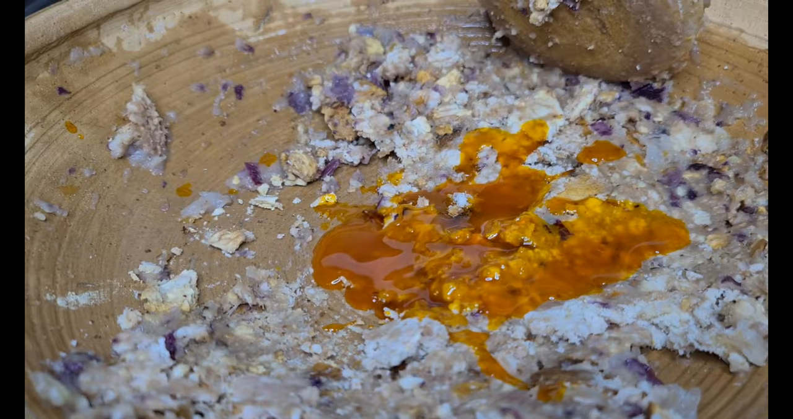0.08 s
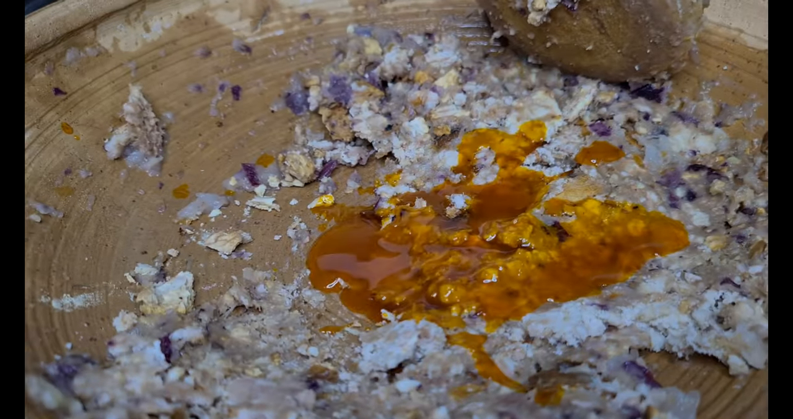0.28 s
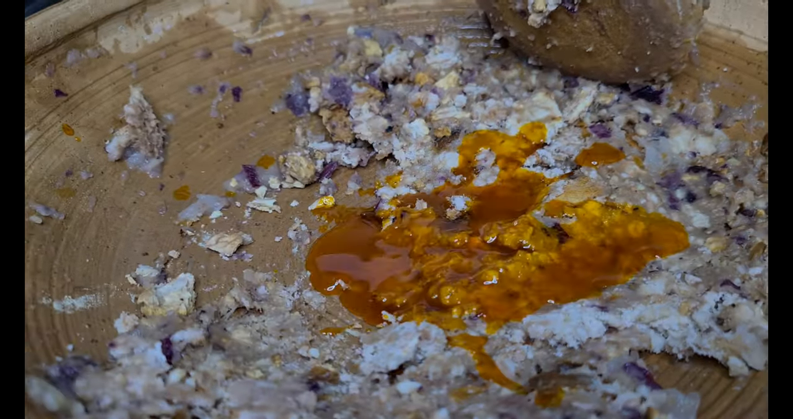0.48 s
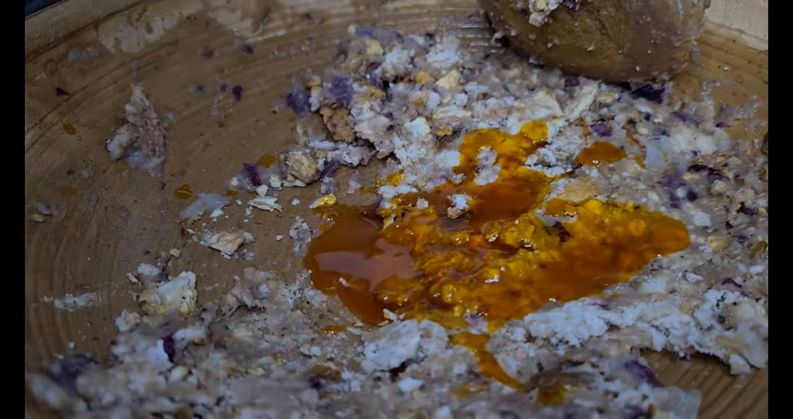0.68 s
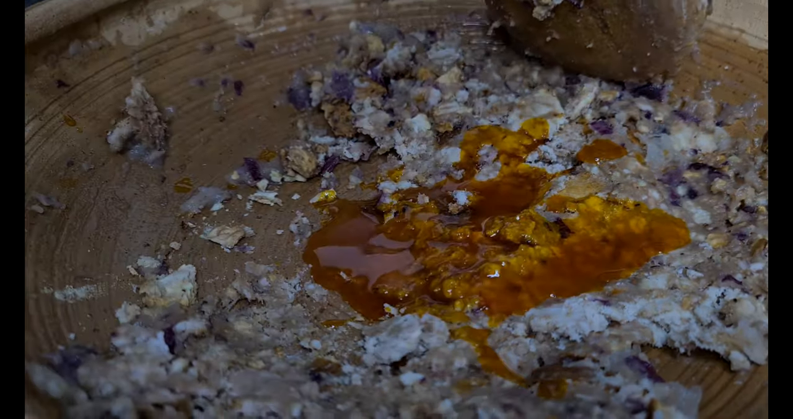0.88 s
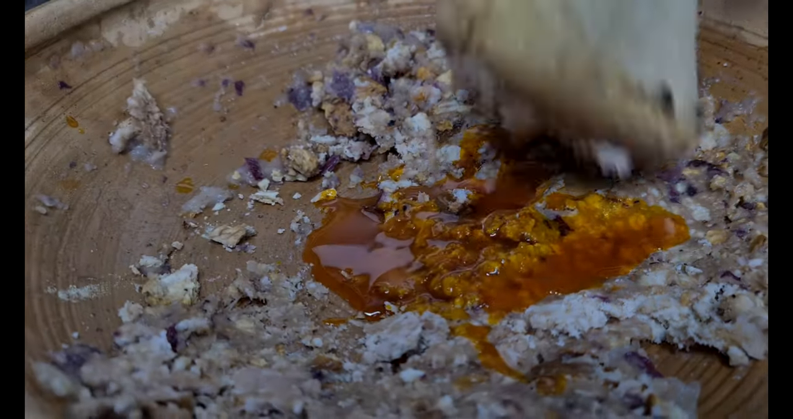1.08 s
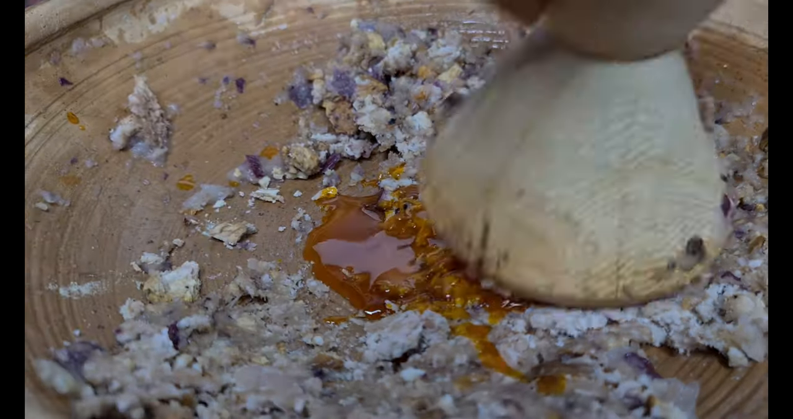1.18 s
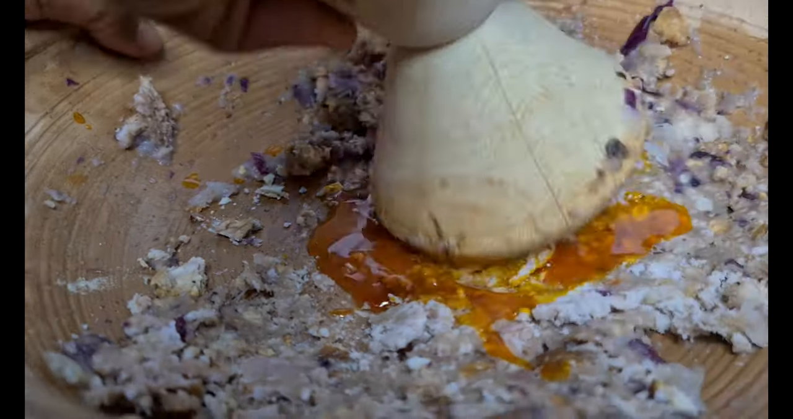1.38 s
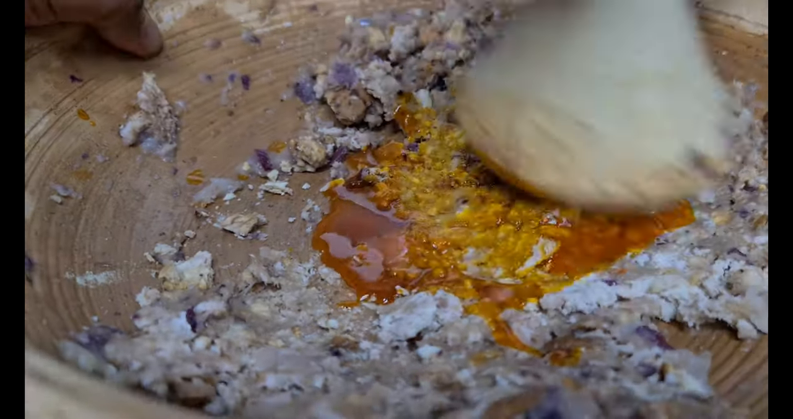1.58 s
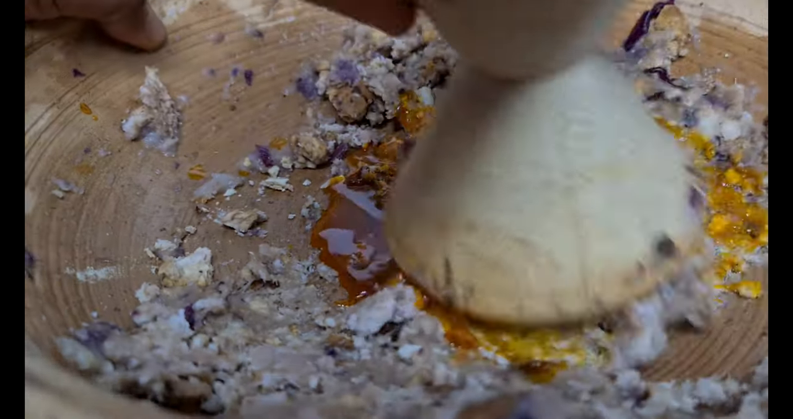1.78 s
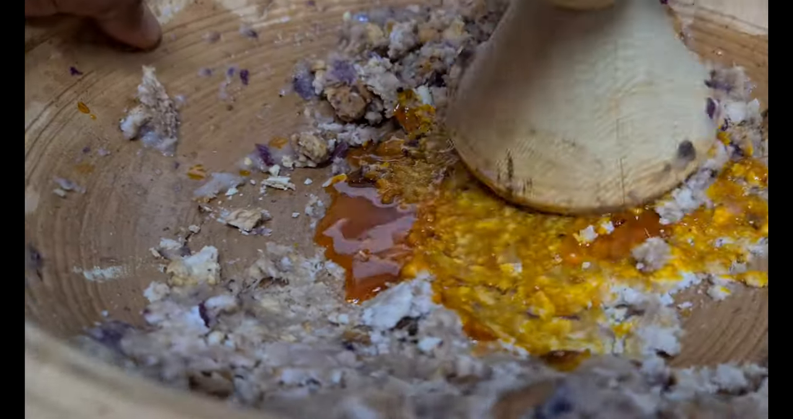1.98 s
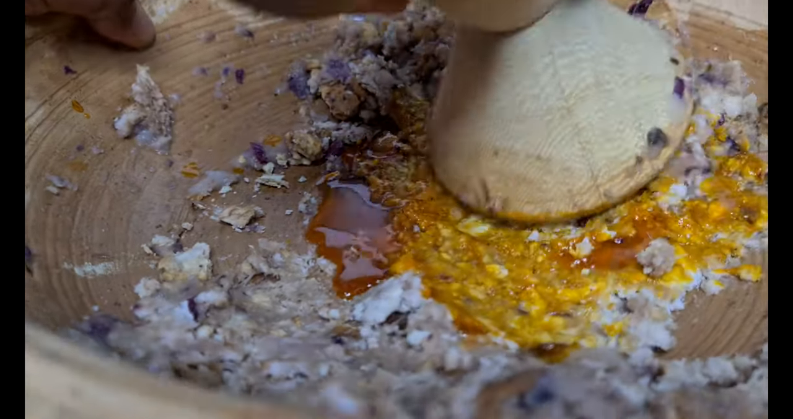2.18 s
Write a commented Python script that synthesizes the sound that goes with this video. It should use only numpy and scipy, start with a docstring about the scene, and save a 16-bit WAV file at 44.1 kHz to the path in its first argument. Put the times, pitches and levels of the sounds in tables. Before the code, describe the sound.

Wet mashing and scraping of a pestle in a clay bowl, preceded by dull knocks and a dish clink

```python
"""A low hum in a small kitchen, then two dull knocks with a light dish tap between them; a utensil slides
on the dish and clinks hard. Then a wooden pestle mashes oily onion and garlic in a ridged clay bowl:
rasp, crunch, squelch and pops. Clicks and clumped grains ring damped modes (bowl, dish, table) or pass
coloured filters (knocks, bits, paste). Low thuds come through the table.
Filtered noise and steady sines make the air and the hum."""
import sys
import numpy as np
from scipy import signal
from scipy.fft import rfft, irfft
from scipy.io import wavfile
from scipy.ndimage import uniform_filter1d

SR = 44100
rng = np.random.default_rng(int(sys.argv[2]) if len(sys.argv) > 2 else 0)


def wav_record(signal):
    """Record a signal, one row per channel, as 16-bit PCM in the file named by sys.argv[1]."""
    frames = np.transpose(np.atleast_2d(signal))
    bounded = np.clip(frames, -1, 1)
    # unit amplitude maps onto the largest positive 16-bit level
    quanta = np.round(bounded * 32767).astype(np.int16)
    wavfile.write(sys.argv[1], SR, quanta)


N = 97020
TIME_S = np.arange(N) / SR

# pestle strokes; rise and fall each span 20 dB:
# (peak time [s], rise [s], fall [s], bowl rasp [dB], crunch [dB], squelch [dB])
STROKES = [(0.874, 0.045, 0.19, -71, -70.5, -60), (1.02, .15, 0.09, -76, -78.5, -69.5),
           (1.165, 0.21, 0.28, -73.5, -65, -51), (1.33, .05, 0.22, -59.5, -58, -55),
           (1.419, 0.041, 0.021, -48, -49.5, -68.5), (1.463, 0.073, 0.039, -49, -50, -51.5),
           (1.521, 0.081, 0.064, -64, -64, -52), (1.603, 0.037, .15, -46.5, -51.5, -42),
           (1.667, 0.056, 0.043, -40.5, -46, -60), (1.773, 0.019, 0.078, -76, -67, -54),
           (1.811, 0.043, 0.054, -50.5, -49.5, -56), (1.832, 0.023, 0.077, -41, -42, -44.5),
           (1.868, 0.09, 0.14, -48.5, -69, -47), (2.024, 0.033, 0.25, -55, -68, -59.5),
           (2.183, 0.047, 0.1, -51.5, -44, -45)]
# modes of the clay bowl, damped by the paste: (frequency [Hz], level [dB], T60 [s])
BOWL_MODES = [(811, -7, 0.039), (1180, -10, 0.0261), (1380, -6.5, 0.018), (1498, -1, 0.032),
              (1610, -4.5, 0.019), (2070, -10, 0.0085)]
# spectrum of crunching bits: (frequency [Hz], level [dB])
CRUNCH_COLOUR = [(60, -23), (250, 2), (400, -2.5), (700, -1), (1000, -4), (1800, 0.5), (3200, 0),
                 (4500, -12.5), (7000, -14.5), (16000, -35)]
# spectrum of wet paste: (frequency [Hz], level [dB])
SQUELCH_COLOUR = [(500, -17.5), (2000, -2), (4500, 0), (7000, -1), (10000, -3), (14000, -3.5), (16000, -2)]
# single pops in the paste: (time [s], level [dB], pitch [Hz])
POPS = [(0.870, -39, 6200), (0.9342, -38.5, 7560), (1.2004, -30.5, 7700), (1.3632, -35, 3800),
        (1.3834, -33.5, 3380), (1.421, -33, 1460), (1.445, -33, 11600), (1.5785, -43, 10000),
        (1.600, -24.5, 7600), (1.628, -36, 6950), (1.661, -33, 910), (1.667, -23, 1200), (1.768, -34, 9000),
        (1.8308, -26.5, 3000), (1.8318, -25, 10500), (1.8705, -24.5, 5940), (1.9295, -21.5, 9000),
        (2.157, -33.5, 3100)]
# pushes that thud through the table: (time [s], level [dB])
THUDS = [(0.234, -30), (0.262, -32), (0.326, -30.5), (0.354, -32.5), (0.585, -35.5), (0.612, -34.5),
         (0.66, -39), (0.852, -35), (1.599, -24), (1.626, -26.5), (1.653, -25.5), (1.807, -31.5),
         (1.850, -24.5), (1.981, -27.5), (1.993, -25), (2.018, -31), (2.033, -35), (2.176, -35.5)]
# modes of the table: (frequency [Hz], level [dB], T60 [s])
TABLE_MODES = [(73.6, -2, 0.22), (110.3, -1.5, 0.15), (148, -13, 0.17)]
# utensil strikes on the dish: (time [s], ring [dB], crack [dB], softness corner [Hz])
CLINKS = [(0.3123, -29, -4, 14000), (0.5797, -16, -11.5, 3960), (0.5811, -5, 6, 5110)]
# modes of the ceramic dish: (frequency [Hz], level [dB], T60 [s])
DISH_MODES = [(784.6, -21.5, 0.16), (1323, -23, 0.033), (1772, -8, 0.057), (2509, -9.5, 0.15),
              (2660, -16, 0.12), (2977, -8.5, 0.073), (3000, -5, 0.097), (3070, -20.5, 0.15),
              (4452, -16.5, 0.031), (4576, -15, 0.091), (4593, -12.5, .06), (6400, -22.5, 0.086),
              (8450, -15.5, 0.095), (10790, -16.5, .09)]
# spectrum of the contact with the dish: (frequency [Hz], level [dB])
CRACK_COLOUR = [(60, -54.5), (250, -24.5), (420, -25.5), (600, 0), (1000, -15), (1300, -17), (2000, -6.5),
                (2550, 6.5), (3200, -1), (3700, -14.5), (4700, 4), (5700, -14), (7000, -6), (8500, -5),
                (9400, -16), (11000, -10), (13500, -9.5), (16000, -22.5)]
# level curve of the utensil sliding on the dish: (time [s], level [dB])
SLIDE = [(0.31, -82), (0.325, -43.5), (0.36, -60), (0.44, -47.5), (0.452, -46.5), (0.48, -40.5),
         (0.508, -31), (0.54, -37.5), (0.578, -44), (0.59, -76)]
# dull knocks on the worktop: (time [s], level [dB])
KNOCKS = [(0.2302, 7), (0.3512, 7)]
# spectrum of the knocks: (frequency [Hz], level [dB])
KNOCK_COLOUR = [(40, -19.5), (110, -4.5), (340, -4), (550, -6), (950, -7.5), (1300, -0.5), (1900, -4),
                (2900, -5.5), (4000, -16), (5200, -32.5), (7000, -36.5), (10000, -46.5), (16000, -72)]
# spectrum of the air noise: (frequency [Hz], level [dB])
AIR_COLOUR = [(20, -15.5), (40, -12), (60, 0), (130, 0), (200, -9.5), (400, -13.5), (700, -15.5),
              (1400, -24.5), (2500, -31.5), (5000, -43.5), (9000, -53), (16000, -60.5)]
# steady hum partials: (frequency [Hz], level [dB rms])
HUM = [(58.5, -54), (117, -62), (146, -60), (240, -64.5), (364, -69.5)]
# reverberation time of the kitchen: (frequency [Hz], T60 [s])
ROOM_T60 = [(100, 0.55), (300, 0.63), (700, 0.32), (3000, 0.4), (6000, 0.42), (14000, 0.25)]

RASPS_PER_S, CRUNCHES_PER_S, SQUELCHES_PER_S = 3600, 1800, 4500
GRAIN_CYCLES, POP_CYCLES = 9.6, 8.4  # cycles within one T60
CLUMP_DB, CLUMP_S = 2.5, 0.012
THUD_SOFT_HZ = 151.3
SLIPS_PER_S, SLIP_SOFT_HZ, SLIP_CRACK_DB = 1000, 3420, 33.5
CRACK_T60_S, CRACK_RATTLE_DB = 0.039, 10
DISH_LOW_HZ = 372  # the dish sounds without bass
KNOCK_T60_S, KNOCK_RATTLE_DB = 0.031, 5
RATTLE_SPREAD_DB = 2.5  # each channel's own noise against the shared noise
AIR_DB, AIR_SIDE_DB, AIR_SIDE_HZ = -53.5, 0.5, 273
ROOM_DELAY_S, ROOM_BUILD_S = 0.002, 0.0013
# pan: left over right; lag: right behind left; room: reverberation against direct sound
BOWL_PAN_DB, BOWL_LAG_S, BOWL_ROOM_DB = 5, 0.00003, -3.5
PASTE_PAN_DB, PASTE_ROOM_DB = 1.5, -11
DISH_PAN_DB, DISH_LAG_S, DISH_ROOM_DB, KNOCK_ROOM_DB = 1.5, 0.00043, -4.5, 0
MIC_LOW_HZ, CUTOFF_HZ = 44, 16000


def stroke_gains():
    """Each stroke swells and dies; strokes add in power, giving rasp, crunch and squelch gains."""
    power = 0
    for peak_s, rise_s, fall_s, *levels_db in STROKES:
        shape = 10 ** -np.maximum((peak_s - TIME_S) / rise_s, (TIME_S - peak_s) / fall_s)
        power = power + np.outer(from_db(levels_db), shape) ** 2
    return np.sqrt(power)


def grinding(rasp_gain, crunch_gain):
    """The pestle catches on the ridges, ringing the bowl, and crushes bits against them."""
    rasp = rms_one(ring(grains(RASPS_PER_S, spread_db=4.5), BOWL_MODES))
    bits = crackle(CRUNCHES_PER_S, spread_db=3.5, low_hz=348, high_hz=9000)
    crunch = rms_one(coloured(bits, CRUNCH_COLOUR))
    return rasp_gain * rasp + crunch_gain * crunch


def paste(squelch_gain):
    """Tiny wet films burst on both sides of the pestle, with a few larger pops."""
    films = [crackle(SQUELCHES_PER_S, spread_db=2.0, low_hz=2030, high_hz=15500) for _ in range(2)]
    fizz = rms_one(coloured(np.array(films), SQUELCH_COLOUR))
    pops = sum(ring(clicks([(s, db)]), [(hz, 0, POP_CYCLES / hz)]) for s, db, hz in POPS)
    return fizz * squelch_gain + pops


def table():
    """Soft downward pushes make the table boom."""
    pushes = soft(soft(clicks(THUDS), THUD_SOFT_HZ), THUD_SOFT_HZ)
    return -ring(pushes, TABLE_MODES)


def dish():
    """Strikes and the stick-slip of the slide ring the same dish; their contact adds cracks."""
    strikes = sum(soft(clicks([(s, db)]), hz) for s, db, _, hz in CLINKS)
    crack_clicks = clicks([(s, db) for s, _, db, _ in CLINKS])
    cracks = convolve(crack_clicks, burst(CRACK_T60_S, CRACK_RATTLE_DB))

    slips = soft(grains(SLIPS_PER_S, spread_db=3.5), SLIP_SOFT_HZ)
    slide_db = np.interp(TIME_S, *np.transpose(SLIDE), left=-np.inf, right=-np.inf)
    slips *= from_db(slide_db) / np.std(ring(slips, DISH_MODES))

    contact = coloured(cracks + from_db(SLIP_CRACK_DB) * slips, CRACK_COLOUR)
    return low_cut(ring(strikes + slips, DISH_MODES) + contact, DISH_LOW_HZ)


def knocks():
    """Dull wooden knocks: clicks with a short rattle, coloured."""
    rattling = convolve(clicks(KNOCKS), burst(KNOCK_T60_S, KNOCK_RATTLE_DB))
    return coloured(rattling, KNOCK_COLOUR)


def room_noise():
    """Dull air noise, alike on both sides in the bass, and an appliance's hum."""
    mid, side = rms_one(coloured(rng.standard_normal((2, N)), AIR_COLOUR))
    side = from_db(AIR_SIDE_DB) * low_cut(side, AIR_SIDE_HZ)
    air = from_db(AIR_DB) * np.array([mid + side, mid - side])
    hum = 0
    for hz, db_rms in HUM:
        hum = hum + from_db(db_rms) * np.sqrt(2) * np.sin(2 * np.pi * (hz * TIME_S + rng.random()))
    return air + hum


def kitchen(size=32768):
    """Stereo reverberation of unit energy: noise whose bands die at their own rates."""
    t, hz = TIME_S[:size], np.fft.rfftfreq(size, 1 / SR)
    white, out = rfft(rng.standard_normal((2, size))), 0
    edges_hz = np.geomspace(40, SR / 2, 11)
    for low, high in zip(edges_hz, edges_hz[1:]):
        band = irfft(white * ((hz >= low) & (hz < high)))
        t60 = at_hz(ROOM_T60, np.sqrt(low * high))
        out = out + band * np.exp(-np.log(1000) * t / t60)
    out *= np.clip((t - ROOM_DELAY_S) / ROOM_BUILD_S, 0, 1)
    return out / np.linalg.norm(out, axis=1, keepdims=True)


def placed(x, room, pan_db, lag_s, room_db):
    """Direct sound, later at the right microphone by the lag, plus the room."""
    x = np.atleast_2d(x)
    direct = np.array([x[0], np.roll(x[-1], int(round(lag_s * SR)))])
    wet = from_db(room_db) * convolve(x, room)
    return (direct + wet) * from_db([[pan_db / 2], [-pan_db / 2]])


def crackle(per_s, spread_db, low_hz, high_hz, count=20):
    """Clumped grains, each ringing a few cycles at one of several pitches; even in spectrum."""
    clumps = rms_one(uniform_filter1d(rng.standard_normal(N), max(int(CLUMP_S * SR), 1)))
    born = grains(per_s, spread_db) * from_db(CLUMP_DB * clumps)
    dealt = rng.integers(0, count, N)
    out = 0
    for k, hz in enumerate(np.geomspace(low_hz, high_hz, count)):
        out = out + ring(born * (dealt == k), [(hz, 0, GRAIN_CYCLES / hz)]) * hz / high_hz
    return out


def grains(per_s, spread_db):
    """Random clicks of either sign, many small and a few large."""
    sizes = from_db(spread_db * np.minimum(rng.exponential(1, N), 4))
    return (rng.random(N) < per_s / SR) * sizes * rng.choice([-1, 1], N)


def clicks(rows):
    """One click for each (time [s], level [dB])."""
    out = np.zeros(N)
    for s, db in rows:
        out[int(s * SR)] += from_db(db)
    return out


def burst(t60_s, rattle_db):
    """A contact: one click and a quickly dying rattle that differs at each microphone."""
    shared, own = rng.standard_normal(N), rng.standard_normal((2, N))
    out = (shared + from_db(RATTLE_SPREAD_DB) * own) * np.exp(-np.log(1000) * TIME_S / t60_s)
    out *= from_db(rattle_db) / np.linalg.norm(out, axis=1, keepdims=True)
    out[:, 0] += 1
    return out


def ring(x, modes):
    """Ring a body's modes as two-pole resonators; a unit click gives each sine its listed height."""
    out = 0
    for hz, db, t60_s in modes:
        r = np.exp(-np.log(1000) / (t60_s * SR))
        w = 2 * np.pi * min(hz, SR / 2) / SR
        # the tiny offset avoids denormals
        mode = signal.lfilter([0, np.sin(w)], [1, -2 * r * np.cos(w), r * r], x + 1e-18)
        out = out + from_db(db) * mode
    return out


def soft(x, hz):
    """A soft contact: one-pole low-pass."""
    r = np.exp(-2 * np.pi * hz / SR)
    return signal.lfilter([1 - r], [1, -r], x + 1e-18)


def low_cut(x, hz):
    """Second-order high-pass."""
    return signal.sosfilt(signal.butter(2, hz, "high", fs=SR, output="sos"), x)


def coloured(x, spectrum, size=8192):
    """Causal (minimum-phase) filter with the given spectrum, by folding the cepstrum."""
    cepstrum = irfft(np.log(from_db(at_hz(spectrum, np.fft.rfftfreq(size, 1 / SR)))))
    cepstrum[1:size // 2] *= 2
    cepstrum[size // 2 + 1:] = 0
    return convolve(x, irfft(np.exp(rfft(cepstrum))))


def convolve(x, response):
    """Play x through an impulse response."""
    return signal.fftconvolve(np.atleast_2d(x), np.atleast_2d(response), axes=-1)[:, :N]


def at_hz(points, hz):
    """Read a table on a log-frequency axis."""
    f, v = np.transpose(points)
    return np.interp(np.log(np.maximum(hz, 1)), np.log(f), v)


def rms_one(x):
    """Scale to rms 1."""
    return x / np.sqrt(np.mean(x ** 2) + 1e-20)


def from_db(db):
    """Decibels to gain."""
    return 10 ** (np.asarray(db) / 20)


def scene():
    """Bowl, paste, dish and knocks, all louder on the left, in one kitchen; thuds and room noise added dry."""
    room = kitchen()
    rasp, crunch, squelch = stroke_gains()
    return (placed(grinding(rasp, crunch), room, BOWL_PAN_DB, BOWL_LAG_S, BOWL_ROOM_DB)
            + placed(paste(squelch), room, PASTE_PAN_DB, 0, PASTE_ROOM_DB)
            + table()
            + placed(dish(), room, DISH_PAN_DB, DISH_LAG_S, DISH_ROOM_DB)
            + placed(knocks(), room, DISH_PAN_DB, DISH_LAG_S, KNOCK_ROOM_DB)
            + room_noise())


def record(dry):
    """The microphone drops the deep bass, peaks are rounded, the top is cut."""
    rounded = np.tanh(low_cut(dry, MIC_LOW_HZ))
    return signal.sosfilt(signal.ellip(10, .1, 90, CUTOFF_HZ, fs=SR, output="sos"), rounded)


dry = scene()
out = record(dry)
wav_record(out)
```